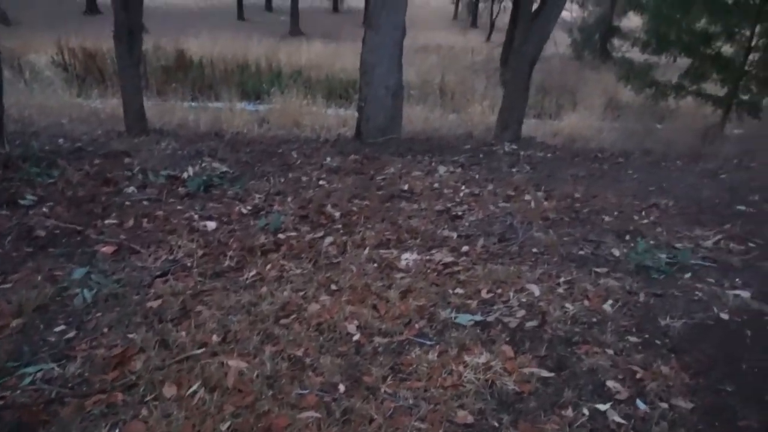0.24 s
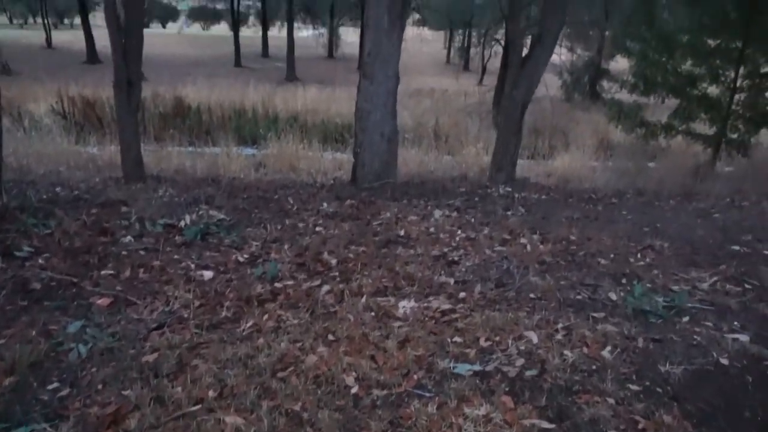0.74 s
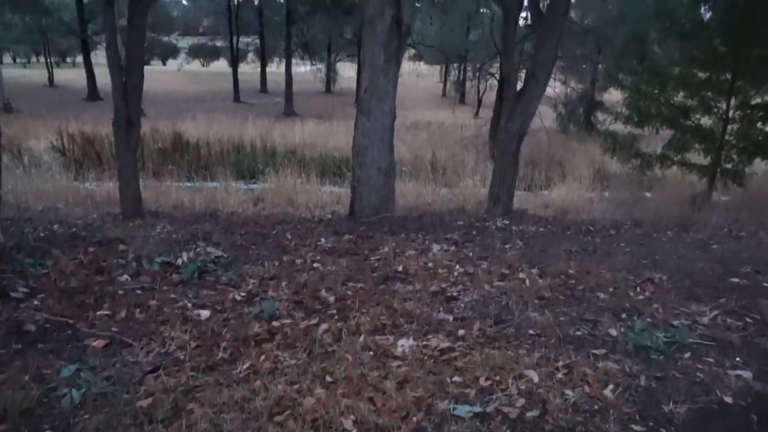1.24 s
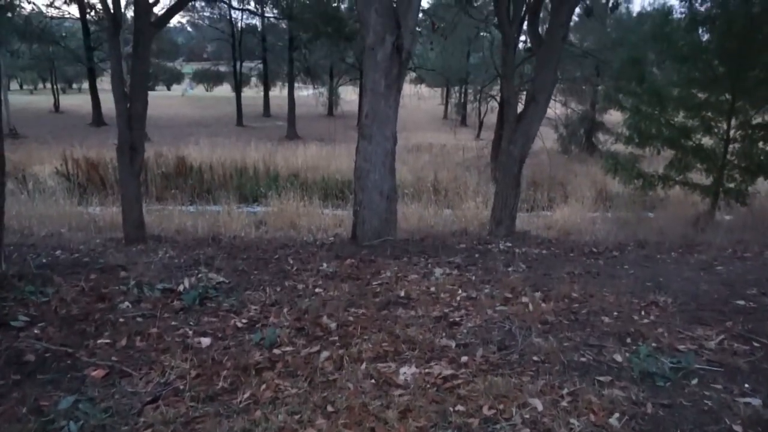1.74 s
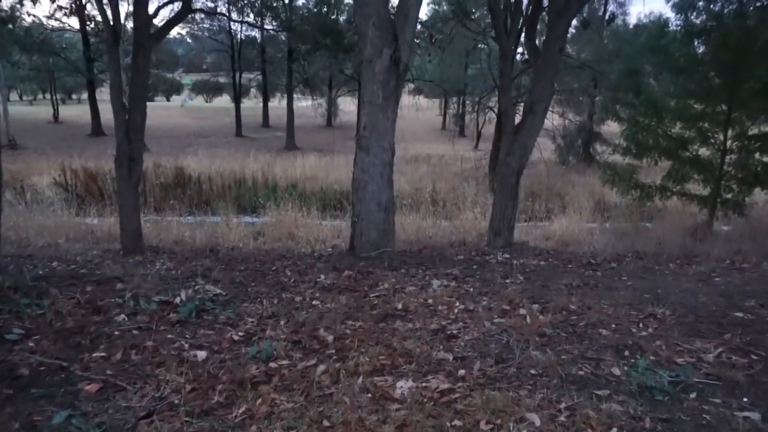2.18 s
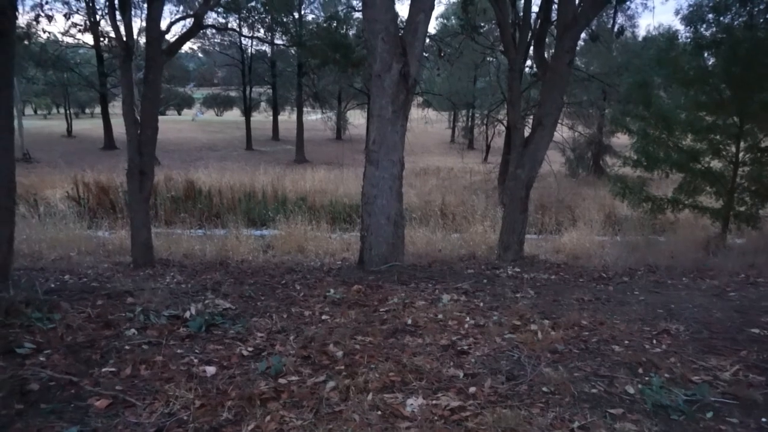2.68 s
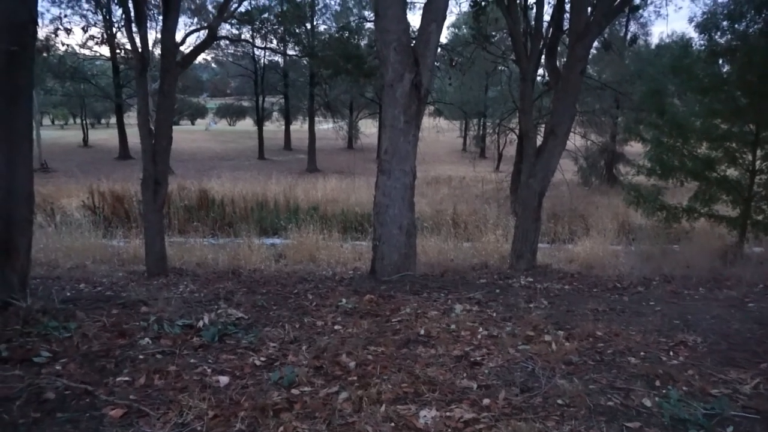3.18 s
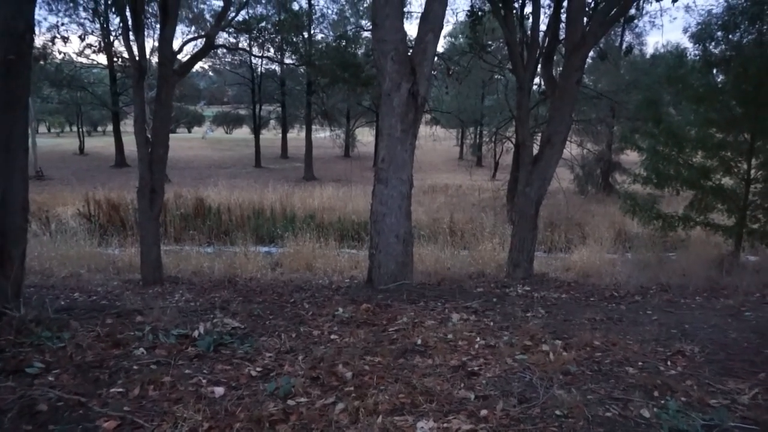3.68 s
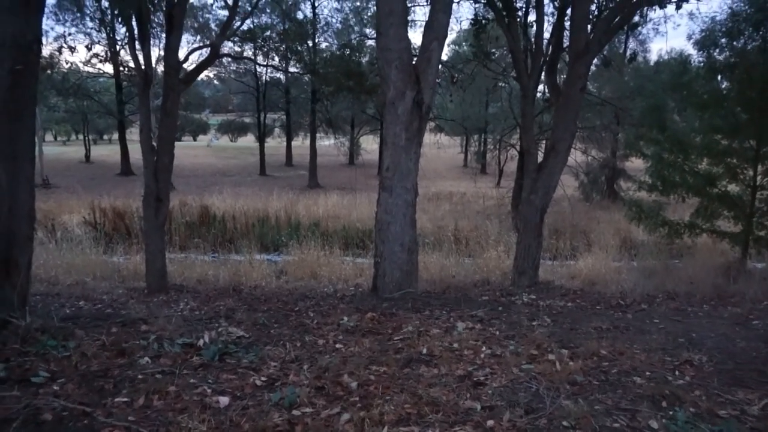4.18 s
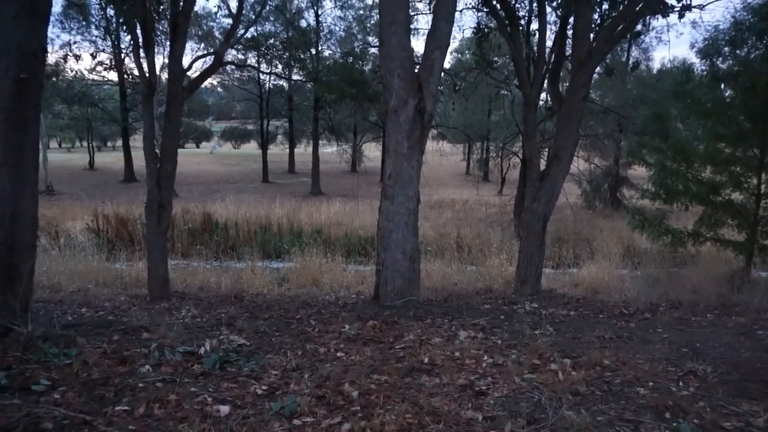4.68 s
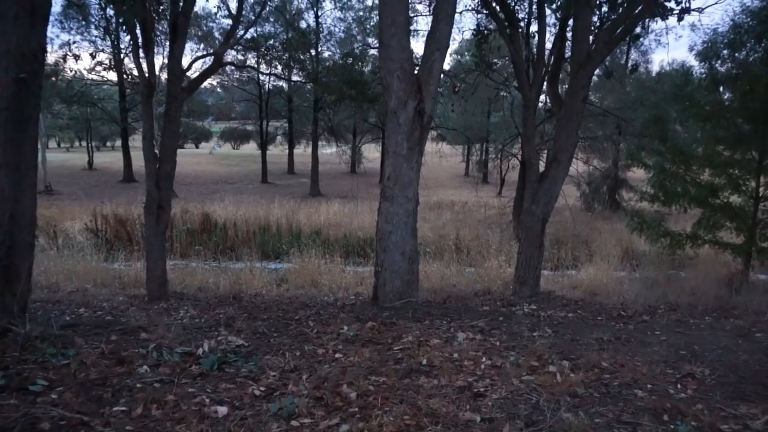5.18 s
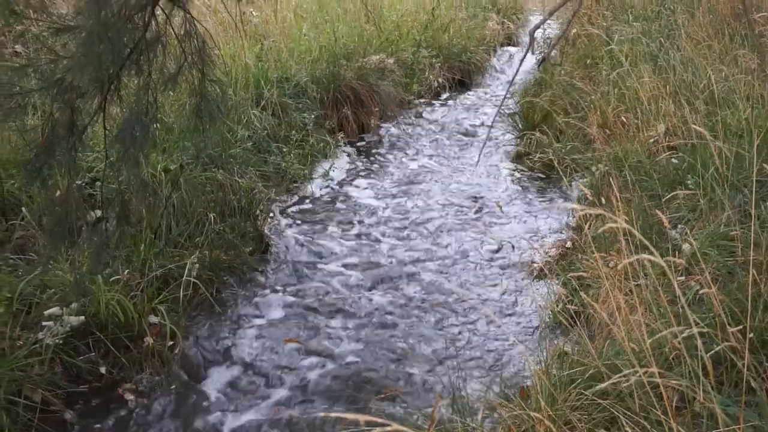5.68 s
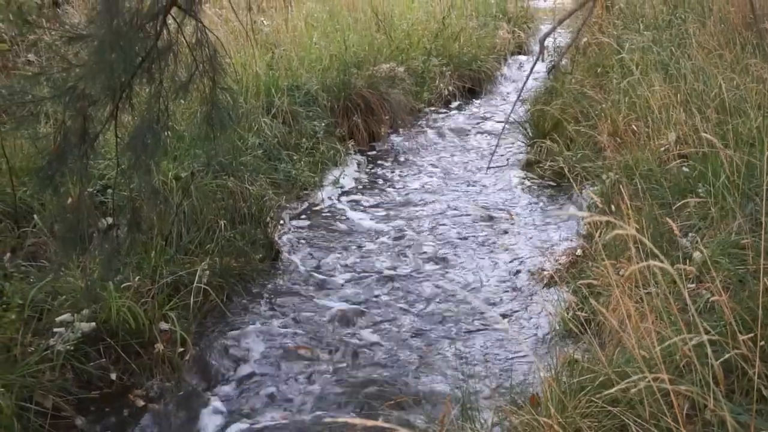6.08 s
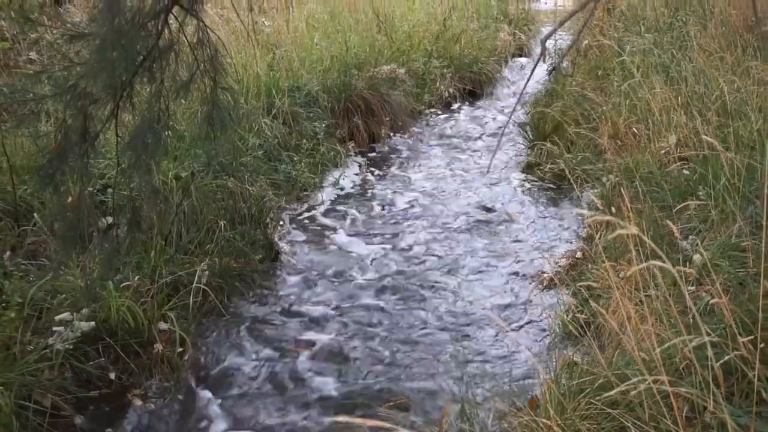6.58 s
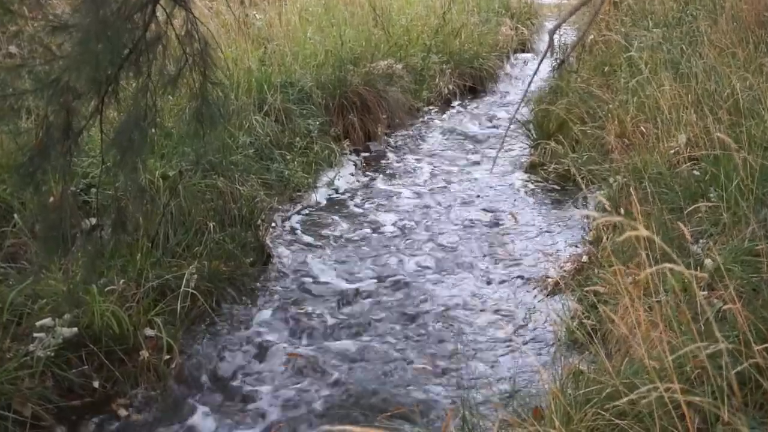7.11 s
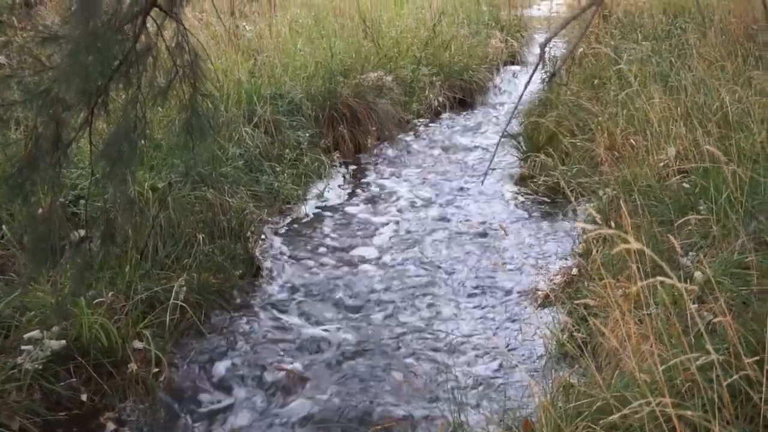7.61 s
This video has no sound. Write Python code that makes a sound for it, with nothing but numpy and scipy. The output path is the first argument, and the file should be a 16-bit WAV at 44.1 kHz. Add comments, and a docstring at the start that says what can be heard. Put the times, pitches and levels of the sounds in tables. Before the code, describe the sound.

Piercing continuous insect churr, near and left of centre, stops suddenly; rushing, bubbling creek water follows with small slaps and gulps and a thin descending bird whistle.

```python
"""Mole cricket at dusk, then a swollen creek

A mole cricket trills close by on the left, 66 strokes a second: each rings the wing at the tooth rate and
rasps. Behind it lie a far chorus of band-passed noise, distant water of flickering noise bands, and ticks.
Then, at the creek: rushing noise and ringing bubbles surge with splashes and gulps, while a small bird pipes
a falling series of whistled notes. Faint low hums come and go."""
import sys
import numpy as np
from scipy import signal
from scipy.fft import rfft, irfft, next_fast_len
from scipy.io import wavfile
from scipy.ndimage import uniform_filter1d, minimum_filter1d

SR = 44100
rng = np.random.default_rng(int(sys.argv[2]) if len(sys.argv) > 2 else 0)


def generate_wav(sig):
    """Save sig (samples, or channels by samples) to the path in sys.argv[1] as 16-bit PCM at SR."""
    pcm = np.round(np.clip(np.atleast_2d(sig).T, -1, 1) * 32767).astype(np.int16)
    wavfile.write(sys.argv[1], SR, pcm)


N = 346185
TIME = np.arange(N) / SR
PADDOCK_END_S, CREEK_START_S = 5.332, 5.355
CUTOFF_HZ = 15750

# Faint low hums. Each row: middle in seconds, pitch in Hz, length in seconds, level in dB.
HUMS = [(1.521, 250, 0.23, -60), (6.37, 201.6, 1.5, -59.5), (7.814, 255, 0.15, -53)]
# Dry ticks by the burrow. Each row: start in seconds, peak in dB, centre in Hz, left minus right in dB.
BURROW_TICKS = [(1.268, -38, 7400, 1), (3.299, -33, 8700, 1.5), (3.392, -33, 6000, 3),
                (4.781, -25, 6500, -5)]
# Distant water spectrum. Each row: frequency in Hz, relative density in dB per Hz.
FIELD_SPECTRUM = [(30, -49), (80, -19.5), (160, -19), (260, -8), (400, -13.5), (750, 2.5), (1100, -0.5),
                  (2000, 3), (3200, -4.5), (4500, -11.5), (6000, -14.5), (10000, -31.5), (16000, -33.5)]
# Distant water level. Each row: time in seconds, rms level in dB.
FIELD_LEVEL = [(0, -47.5), (.7, -44.5), (1.3, -41), (3.8, -37), (5.3, -36.5)]
# Distant water stereo. Each row: frequency in Hz, left-right likeness (0 to 1).
FIELD_STEREO = [(60, .5), (150, 1), (640, 0.73), (1400, 0.04), (3000, 0), (7000, 0)]

# The bird's notes slow down and sink towards a resting pitch.
PIPING_START_S, PIPING_GAP_S, PIPING_SLOWING_S = 5.456, .0998, .001
PIPING_REST_HZ, PIPING_FALL_HZ, PIPING_SETTLE_S = 3740, 319, 0.98

# Creek spectrum. Each row: frequency in Hz, relative density in dB per Hz.
CREEK_SPECTRUM = [(24, -67), (40, -47), (167, -25), (194, -25), (283, -22), (529, -9), (697, -6.5),
                  (1340, 1.5), (1950, 1), (2840, -1.5), (3830, -12.5), (4340, -19), (8770, -20),
                  (12500, -17), (16000, -39)]
# Creek stereo. Each row: frequency in Hz, left-right likeness (0 to 1).
CREEK_STEREO = [(60, 0.91), (130, 0.93), (290, 0.82), (640, 0.86), (1410, 0.74), (3100, 0.26), (6820, 0.1),
                (15000, 0.21)]
# Wavelets slap shut. Each row: start in seconds, slap level in dB, pitch in Hz, left minus right in dB,
# relative level of the droplets in dB.
SLAPS = [(5.4994, -22, 1450, 5, -26), (5.5481, -21.5, 3140, -12, -1.5), (5.5972, -22, 2160, -1, -26),
         (5.7168, -24.5, 1500, -1, -1.5), (5.8757, -20, 2440, -1, -13), (6.2165, -19.5, 1230, 1, -11),
         (6.241, -19, 1790, -4, -11), (6.347, -16.5, 2320, -2, -6.5), (6.675, -14, 1610, 4.5, -7.5),
         (6.7016, -17.5, 1860, -1, -5.5), (7.391, -18, 2100, -6, -23), (7.658, -20.5, 1590, -.5, -9),
         (7.7367, -26.5, 1820, 0, -2)]
# Large air pockets. Each row: start in seconds, level in dB, pitch in Hz, pitch rise in octaves per second.
AIR_POCKETS = [(5.612, -26, 720, 5.5), (5.69, -25.5, 960, 1), (5.978, -23, 1215, 13.5),
               (6.02, -26.5, 619, 1), (6.172, -27, 1120, 9), (6.213, -30, 837, 2), (6.336, -22.5, 1270, -4),
               (6.475, -21, 1360, 5), (6.493, -22.5, 533, 0.5), (6.604, -25, 607, 3.5),
               (6.653, -23.5, 1310, 2.5), (6.692, -28, 506, 2), (6.721, -22.5, 831, 21.5),
               (6.875, -28, 535, 1), (6.987, -24.5, 1290, 30.5), (7.3, -24.5, 1254, 8),
               (7.474, -26.5, 510, 4), (7.561, -29, 520, 27.5), (7.793, -23, 977, 7)]
# Waves break over the steady flow. Each row: crest in seconds, extra gurgle in dB, extra spray in dB.
WAVES = [(5.71, 0, 3), (6.23, 4.5, 5.5), (6.36, 5, 7.5), (6.51, 3.5, 1), (6.60, 3, 1), (6.69, 5, 3.5),
         (7.25, 2.5, 1), (7.83, 7, 1)]
GURGLE_DB, RUSH_DB, SPRAY_DB = -41.5, -34.5, -40   # steady flow
SURGE_ATTACK_S, SURGE_RELEASE_S = 0.036, 0.089
RUSH_SHARE = 0.19   # the rush takes this share of each surge
GULP_T60_S, GULP_SIZE_LAW = 0.069, 0.77   # ring of a steady 1 kHz pocket; deeper ones ring longer
BLOOP_RISE_OCT_PER_S = 36   # a pocket rising this fast rings twice as long

# Strokes that slip or miss the file. Each row: time in seconds, level change in dB,
# seconds by which the beat falls behind.
STROKE_SLIPS = [(.150, -36, 0), (1.103, -3, 0.0002), (1.119, -32, 0.0046), (2.295, -4.5, 0.00063),
                (3.288, -46, 0.0028), (3.381, -43, 0.0011), (5.159, -5, 0.0011)]
# Wing overtones. Each row: multiple of the pitch, left level in dB, right level in dB, right phase lag in rad,
# centre within the stroke (-1 to 1), width on the same scale.
WING_OVERTONES = [(2, -31.5, -30.5, 2.5, -0.25, 0.2), (2, -31.5, -29, 3.0, .55, 0.11),
                  (3, -42, -39.5, 4, 0.00053, 0.67), (4, -38, -40, 0.8, 0.17, 0.45),
                  (5, -45.5, -60, -8.5, 0.58, 0.25), (6, -51.5, -65, -3, -.4, 0.29),
                  (7, -50, -62, 0.2, 0, .45)]
# Rasp of scraper on file. Each row: frequency in Hz, relative density in dB per Hz.
RASP_SPECTRUM = [(1000, -34), (1450, -6), (1800, 5), (2600, 6.5), (3400, -8.5), (4100, -7.5), (4800, -24),
                 (7600, -30.5), (9200, -16), (10400, -21), (11500, -34), (12600, -19.5), (15000, -22.5),
                 (16000, -33)]
# Fundamental of the trill on the right. Each row: time in seconds, level relative to the left in dB.
RIGHT_TONE = [(0.4, -8), (1.2, -10.5), (2.7, -11.5), (4.8, -9)]
# Right-side gain of overtones, and in part of the rasp. Each row: time in seconds, gain in dB.
RIGHT_TREBLE = [(0, -6), (.55, -7), (1.15, -6.5), (2, -2.5), (3, 1), (4.8, 4.5), (5.3, 2.5)]
STROKES_PER_S = 66.32
CATCH_UP_S = .65   # after a stumble the wings regain their beat
TRILL_DB = -1.0


def from_db(db):
    """Decibels to gain."""
    return 10 ** (np.asarray(db) / 20)


def rms_one(x):
    """Scale to unit rms."""
    return x / np.sqrt(np.mean(x ** 2) + 1e-20)


def in_time(rows):
    """Read a (seconds, value) curve at every sample."""
    seconds, values = np.transpose(rows)
    return np.interp(TIME, seconds, values)


def at_hz(rows, hz):
    """Read a (Hz, value) curve on a log-frequency axis."""
    points_hz, values = np.transpose(rows)
    return np.interp(np.log(hz), np.log(points_hz), values)


def drift(corner_hz):
    """Low-passed chance with spread 1, computed at every 40th sample."""
    step = 40
    r = np.exp(-2 * np.pi * corner_hz * step / SR)
    white = rng.standard_normal(N // step + 2002)
    slow = signal.lfilter([1], [1, -2 * r, r * r], white)[2000:]
    return np.interp(np.arange(N) / step, np.arange(len(slow)), rms_one(slow))


def band(x, low_hz, high_hz):
    """Gentle band-pass."""
    sos = signal.butter(2, [low_hz, min(high_hz, .49 * SR)], "band", fs=SR, output="sos")
    return signal.sosfilt(sos, x)


def coloured(x, spectrum):
    """Filter a signal by a spectrum; rms 1."""
    size = next_fast_len(N)
    gain = from_db(at_hz(spectrum, np.fft.rfftfreq(size, 1 / SR) + 1))
    return rms_one(irfft(rfft(x, size) * gain, size)[..., :N])


def panned(left_minus_right_db):
    """Left and right gains."""
    return from_db(np.array([[.5], [-.5]]) * left_minus_right_db)


def add(out, start_s, sound):
    """Mix a short sound in at a time."""
    i = max(int(start_s * SR), 0)
    out[:, i:i + sound.shape[-1]] += sound[..., :max(N - i, 0)]


def water_noise(spectrum, likeness, patchy_db, flicker_hz):
    """Half-octave bands of stereo noise, each flickering on its own; rms 1."""
    out, edges_hz = 0, 30 * 2 ** np.arange(0, 9.6, .5)
    white = rng.standard_normal((2, 2, N))   # neighbouring bands use different noise
    for k, (low_hz, high_hz) in enumerate(zip(edges_hz, edges_hz[1:])):
        mid, side = band(white[k % 2], low_hz, high_hz)
        centre_hz = np.sqrt(low_hz * high_hz)
        alike = np.clip(at_hz(likeness, centre_hz), -1, 1)
        stereo = np.sqrt(1 + alike) * mid + np.sqrt(1 - alike) * side * [[1], [-1]]
        out = out + from_db(at_hz(spectrum, centre_hz) + patchy_db * drift(flicker_hz)) * stereo
    return rms_one(out)


def bubble(hz, t60_s, rise_oct_per_s):
    """A pocket of air rings down while its pitch glides, upwards as it nears the surface."""
    age_s = TIME[:int(t60_s * SR) + 2]
    phase = 2 * np.pi * np.cumsum(hz * 2 ** (rise_oct_per_s * age_s)) / SR
    return np.sin(phase) * np.exp(-np.log(1000) * age_s / t60_s) * (1 - np.exp(-age_s * hz))


def hum():
    """Faint low tones swell and fade."""
    out = np.zeros((2, N))
    for middle_s, hz, length_s, db in HUMS:
        t = TIME[:int(length_s * SR)]
        swell = np.sin(np.pi * t / length_s) ** 0.68
        add(out, middle_s - length_s / 2, from_db(db) * swell * np.sin(2 * np.pi * hz * t))
    return out


def distant_water():
    """Flickering noise bands whose level follows a slow curve."""
    noise = water_noise(FIELD_SPECTRUM, FIELD_STEREO, patchy_db=2.0, flicker_hz=14)
    return from_db(in_time(FIELD_LEVEL)) * noise


def far_chorus(level_db=-35):
    """Far neighbours blur into a narrow band of noise."""
    blur = band(band(rng.standard_normal((2, N)), 1900, 2220), 2200, 3100)
    return from_db(level_db) * rms_one(blur) * panned(2.7)


def ticks(decay_s=0.0014):
    """Tiny dry clicks: decaying bursts of band-passed noise."""
    out, t = np.zeros((2, N)), TIME[:SR // 40]
    for start_s, db, hz, pan_db in BURROW_TICKS:
        click = band(rng.standard_normal(len(t)) * np.exp(-t / decay_s), hz * 0.47, hz * 1.5)
        add(out, start_s, from_db(db) * panned(pan_db) * click / abs(click).max())
    return out


def bird(note_s=0.072, glide_hz=90, level_db=-39.5, uneven_db=1.5, waver_hz=35, count=18):
    """Thin whistled notes, each sliding up a little, each lower than the last and at a widening gap."""
    out, place, middle_s = np.zeros((2, N)), np.linspace(-.5, .5, int(note_s * SR)), PIPING_START_S
    waver = waver_hz * drift(53)
    for k, chance in enumerate(rng.standard_normal(count)):
        note_hz = PIPING_REST_HZ + PIPING_FALL_HZ * np.exp(-(middle_s - PIPING_START_S) / PIPING_SETTLE_S)
        hz = note_hz + glide_hz * place + waver[int(middle_s * SR):][:len(place)]
        whistle = np.cos(np.pi * place) ** 2 * np.sin(2 * np.pi * np.cumsum(hz) / SR)
        add(out, middle_s - note_s / 2, from_db(level_db + uneven_db * chance) * whistle)
        middle_s += PIPING_GAP_S + PIPING_SLOWING_S * k
    return out


def bubbles(per_s=950, low_hz=380, high_hz=6000, ring_cycles=36, size_db=3.0, spread_db=16.0,
            rise_oct_per_s=14):
    """Bubbles of all sizes are folded under at random; rms 1 at the creek."""
    out, duration_s = np.zeros((2, N)), TIME[-1] - CREEK_START_S
    for when, pitch, size, life, side, depth in rng.random((int(per_s * duration_s), 6)):
        hz = low_hz * (high_hz / low_hz) ** pitch
        gain = from_db(size_db * min(-np.log(1 - size), 4.0)) * hz / low_hz
        ring = bubble(hz, ring_cycles * (.5 + life) / hz, rise_oct_per_s * depth ** 2)
        add(out, CREEK_START_S + when * duration_s, gain * panned(spread_db * (2 * side - 1)) * ring)
    return coloured(out, CREEK_SPECTRUM) * np.sqrt(duration_s / TIME[-1])


def splashes(droplets_db=5.0, slap_decay_s=0.0012, droplets_decay_s=0.002, ring_db=-6.0):
    """A slap is a short noise burst with a small bubble and a tick of droplets."""
    out, t = np.zeros((2, N)), TIME[:SR // 20]
    for start_s, db, hz, pan_db, bright_db in SLAPS:
        burst = rng.standard_normal((2, len(t))) * np.exp(-t / [[slap_decay_s], [droplets_decay_s]])
        slap = band(burst[0], hz * 0.81, hz * 1.3)
        droplets = band(burst[1], 7200, 15400)
        sound = slap / abs(slap).max() + from_db(droplets_db + bright_db) * droplets / abs(droplets).max()
        add(out, start_s, from_db(db) * panned(pan_db) * sound)
        ring = bubble(hz, t60_s=0.04, rise_oct_per_s=9.6)
        add(out, start_s, from_db(db + ring_db) * panned(pan_db) * ring)
    return out


def gulps():
    """Each gulp is one big bubble; low pitch and a fast glide lengthen its ring."""
    out = np.zeros((2, N))
    for start_s, db, hz, rise in AIR_POCKETS:
        t60_s = GULP_T60_S * (hz / 1000) ** -GULP_SIZE_LAW * (1 + (rise / BLOOP_RISE_OCT_PER_S) ** 2)
        add(out, start_s, from_db(db) * band(bubble(hz, t60_s, rise), hz * 0.5, hz * 2.0))
    return out


def surges():
    """Gurgle, rush and spray in dB: each wave rises fast and ebbs back to the steady flow."""
    deep_db, fine_db = 0, 0
    for crest_s, gurgle_db, spray_db in WAVES:
        since_s = TIME - crest_s
        wave = np.exp(-np.where(since_s < 0, (since_s / SURGE_ATTACK_S) ** 2, since_s / SURGE_RELEASE_S))
        deep_db, fine_db = deep_db + gurgle_db * wave, fine_db + spray_db * wave
    return GURGLE_DB + deep_db, RUSH_DB + RUSH_SHARE * (deep_db + fine_db), SPRAY_DB + fine_db


def creek(bubbles_db=-2.5, fizz_db=1.5):
    """Rush and bubbles surge in three registers: deep gurgle, open water, fine spray."""
    water = water_noise(CREEK_SPECTRUM, CREEK_STEREO, patchy_db=1.5, flicker_hz=24.0)
    water = water + from_db(bubbles_db) * bubbles()
    below_900, below_4500 = [signal.sosfiltfilt(signal.butter(4, hz, fs=SR, output="sos"), water)
                             for hz in (900, 4500)]
    gurgle = below_900 + 0.43 * band(below_900, 387, 627)   # rings most at one hollow pitch
    rush = below_4500 - below_900
    spray = (water - below_4500) * from_db(fizz_db * drift(500))
    registers = (gurgle * panned(-.5), rush * panned(-1.2), spray * panned(1.0))
    at_creek = TIME > CREEK_START_S
    flow = sum(from_db(db) * x / x[:, at_creek].std() for x, db in zip(registers, surges()))
    return splashes() + gulps() + flow


def trees(x, t60_s=0.15, wet_db=-24.5):
    """Ground and trunks scatter a thin, dull tail of the left channel, weaker on the right."""
    t = TIME[:SR // 2]
    tail = band(rng.standard_normal((2, len(t))), 500, 5300)
    tail = tail * np.exp(-np.log(1000) * t / t60_s) * (t > .004)
    tail /= np.sqrt(np.sum(tail ** 2, axis=1, keepdims=True))
    return from_db([[wet_db], [wet_db - 8]]) * signal.fftconvolve(x[:1], tail, axes=1)[:, :N]


def wing_strokes(jitter_s=0.00036, uneven_db=0.07):
    """For every sample: seconds from the middle of the nearest stroke, its strength and its number."""
    beat_s = np.arange(0, PADDOCK_END_S, 1 / STROKES_PER_S)
    chance = rng.standard_normal((len(beat_s), 2))
    middles_s = beat_s + jitter_s * chance[:, 0]
    level_db = -uneven_db * abs(chance[:, 1]) ** 1.6
    for when_s, db, delay_s in STROKE_SLIPS:
        slip = np.argmin(abs(beat_s - when_s))
        level_db[slip] += db
        middles_s[slip:] += delay_s * np.exp(-(beat_s[slip:] - beat_s[slip]) / CATCH_UP_S)
    number = np.searchsorted((middles_s[1:] + middles_s[:-1]) / 2, TIME)
    return TIME - middles_s[number], from_db(level_db)[number], number


def mole_cricket(pitch_hz=2172, sag_hz=110, stroke_s=.0094, right_lag_rad=1.26, rasp_db=-28.0,
                 catch_db=2.0, scratch_db=5.0, bite_spread=0.11, effort_db=.35, overtone_spread_db=1.5,
                 rasp_treble_share=0.71, slip_rasp=.4, length_spread=0.056):
    """Each closing stroke drags the scraper over the file and rings the wing at the tooth rate."""
    age_s, strength, number = wing_strokes()
    strokes = number[-1] + 1
    length, detune, scratch, start, lean, late = rng.standard_normal((strokes, 6))[number].T
    # -1 to 1 through the stroke
    place = age_s / (.5 * stroke_s * (1 + length_spread * np.clip(length, -2, 2)))
    inside = np.clip(place, -1, 1)
    # where the scraper catches: the later, the more abrupt the attack
    bite = np.minimum(-.97 + bite_spread * late ** 2, -.25)
    swell = np.cos(np.pi / 2 * inside).clip(0) * (1 + .04 * drift(350))
    swell = swell * (.5 + .5 * np.tanh((place - bite) / 0.099))

    # the teeth pass fastest just after mid-stroke; every stroke starts at a fresh phase
    sag = sag_hz * np.minimum(((place - .1) / .66) ** 2, 1.4)
    hz = pitch_hz + 11 * detune + 18 * lean * inside - sag + 20 * drift(387)
    phase = 2 * np.pi * np.cumsum(hz) / SR + 2 * np.pi * start
    level_db = TRILL_DB + effort_db * drift(2.5)
    right_gain = from_db(in_time(RIGHT_TONE))
    tone = swell * np.array([np.sin(phase), right_gain * np.sin(phase - right_lag_rad)])

    treble = np.array([np.ones(N), from_db(in_time(RIGHT_TREBLE))])
    for multiple, left_db, right_db, lag_rad, centre, width in WING_OVERTONES:
        partial = round(multiple) * phase + 0.43 * drift(270)
        uneven = from_db(overtone_spread_db * rng.standard_normal(strokes))[number]
        pair = np.array([from_db(left_db) * np.sin(partial), from_db(right_db) * np.sin(partial - lag_rad)])
        tone += treble * uneven * np.exp(-((place - centre) / width) ** 2) * pair

    # the scraper rasps throughout, and with a dull click as it catches the file
    direct, scattered = coloured(rng.standard_normal((2, N)), RASP_SPECTRUM)
    lag_s = right_lag_rad / (2 * np.pi * pitch_hz)   # it reaches the right side later
    delayed = np.interp(TIME - lag_s, TIME, direct)
    grit = np.array([direct, from_db(-5.0) * delayed + from_db(-12.5) * scattered])
    catch = from_db(catch_db + scratch_db * np.clip(scratch, -2, 2)) * np.exp(-((place - bite) / 0.18) ** 2)
    click = (band(grit, 830, 4500) + .3 * grit) * catch
    drag = grit * (0.5 + 0.45 * np.sqrt(swell.clip(0)))
    rasp = from_db(rasp_db) * treble ** rasp_treble_share * (drag + click)
    # a missed stroke still scrapes
    return from_db(level_db) * (strength * tone + np.maximum(strength, slip_rasp) * rasp)


def paddock():
    """The near cricket with its scattered tail, over far chorus, distant water and ticks."""
    cricket = mole_cricket()
    return cricket + trees(cricket) + far_chorus() + distant_water() + ticks()


def scene(fade_out_s=.031, fade_in_s=0.19, fade_curve=0.67):
    """The paddock fades quickly and the creek bank fades in; hums lie under both."""
    in_paddock = np.clip((PADDOCK_END_S - TIME) / fade_out_s, 0, 1)
    at_creek = np.clip((TIME - CREEK_START_S) / fade_in_s, .004, 1) ** fade_curve
    at_creek = at_creek * (TIME > PADDOCK_END_S)
    return in_paddock * paddock() + at_creek * (creek() + bird()) + hum()


def record(dry, knee=12):
    """A fast limiter evens out the loudest peaks towards full scale; the top is cut."""
    peak = -minimum_filter1d(-abs(dry).max(axis=0), size=SR // 200)   # running maximum
    gain = (1 + peak ** knee) ** (-1 / knee)
    limited = dry * uniform_filter1d(gain, size=SR // 300)
    return signal.sosfilt(signal.ellip(12, .1, 90, CUTOFF_HZ, fs=SR, output="sos"), limited)


dry = scene()
out = record(dry)
generate_wav(out)
```